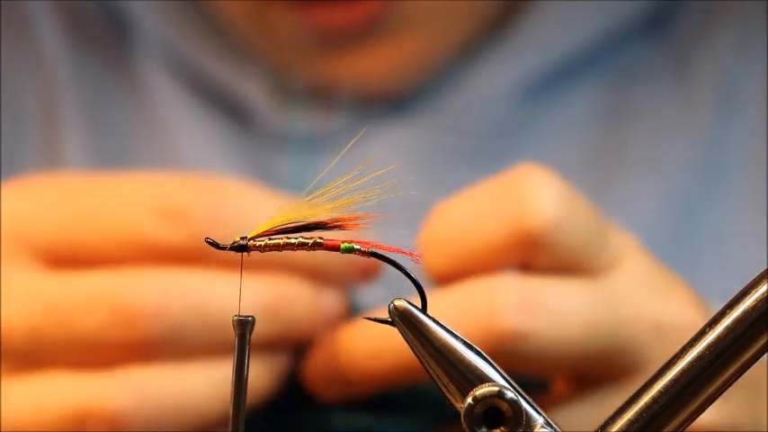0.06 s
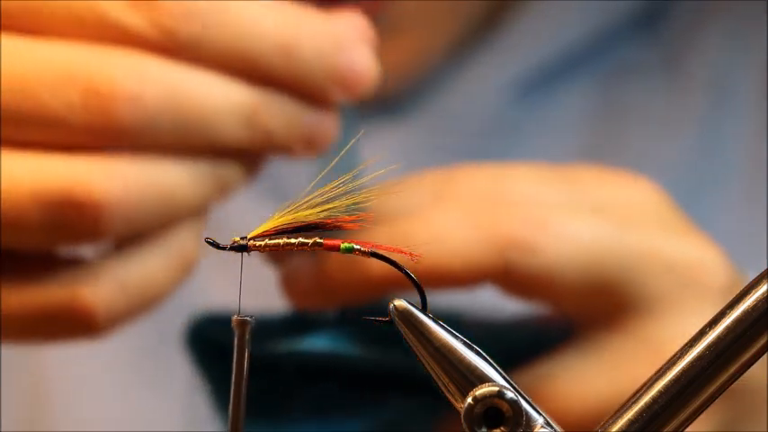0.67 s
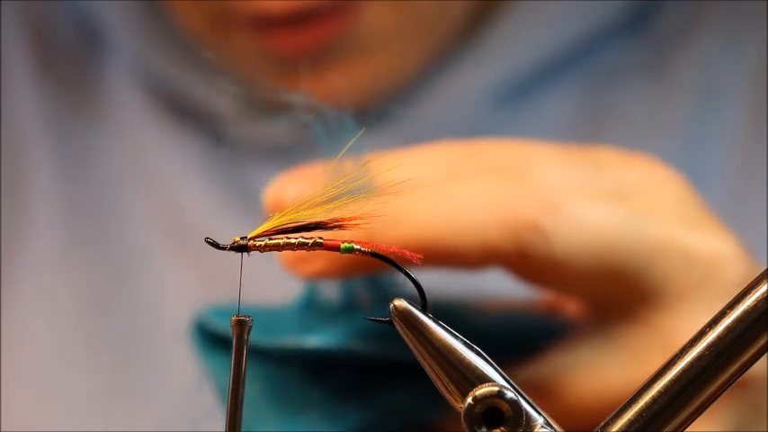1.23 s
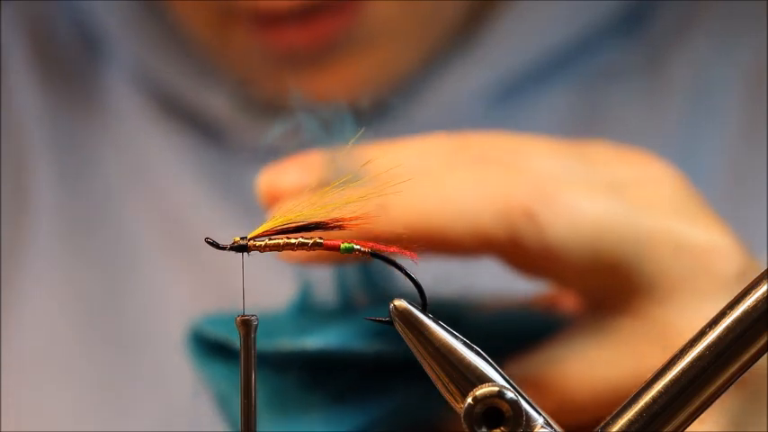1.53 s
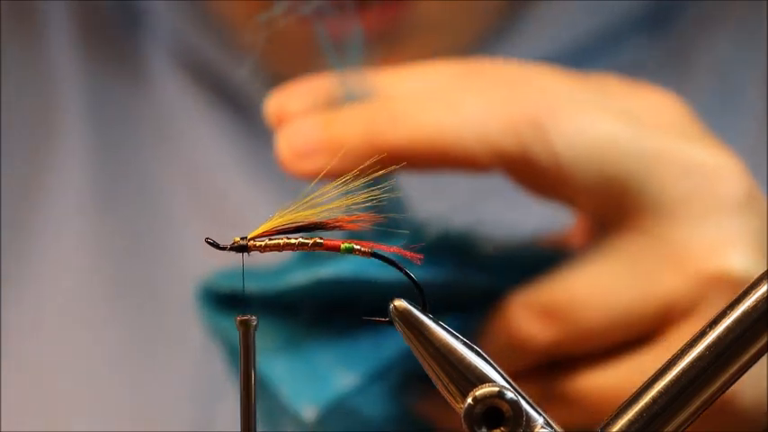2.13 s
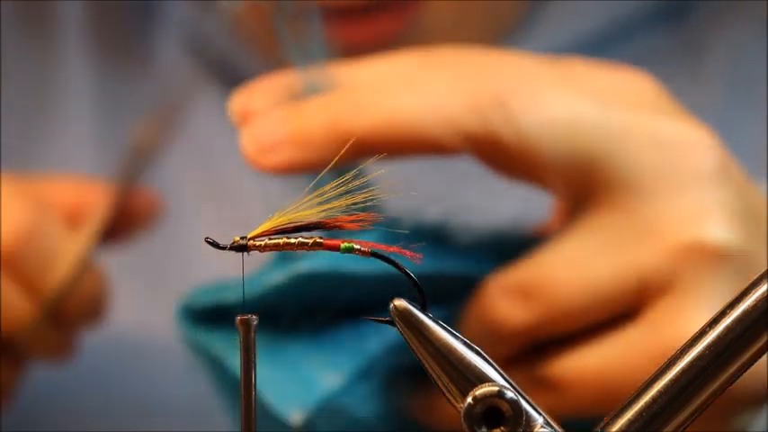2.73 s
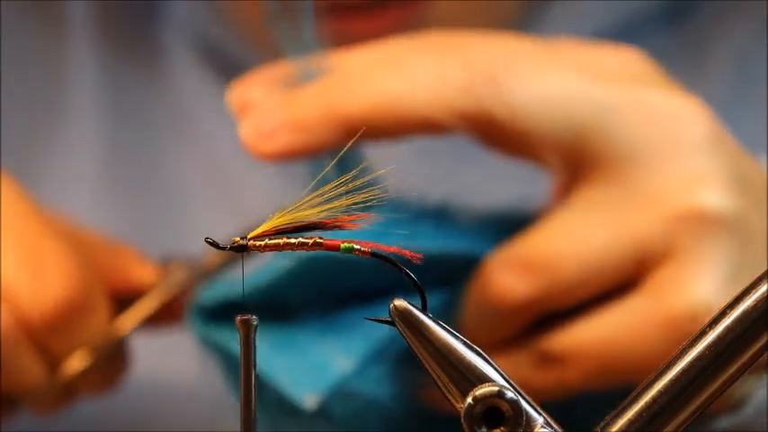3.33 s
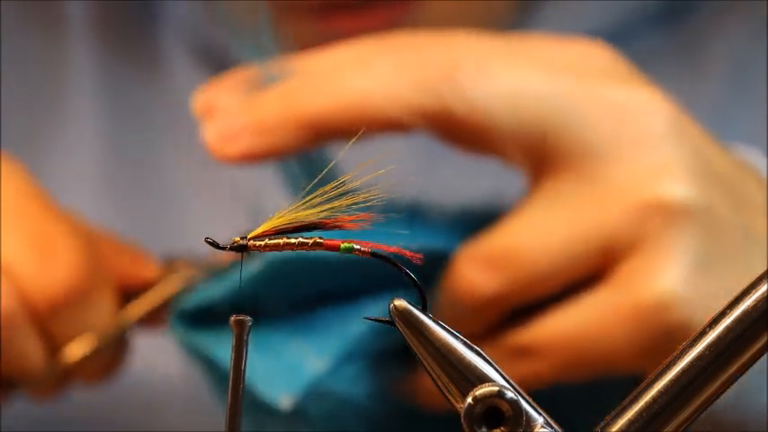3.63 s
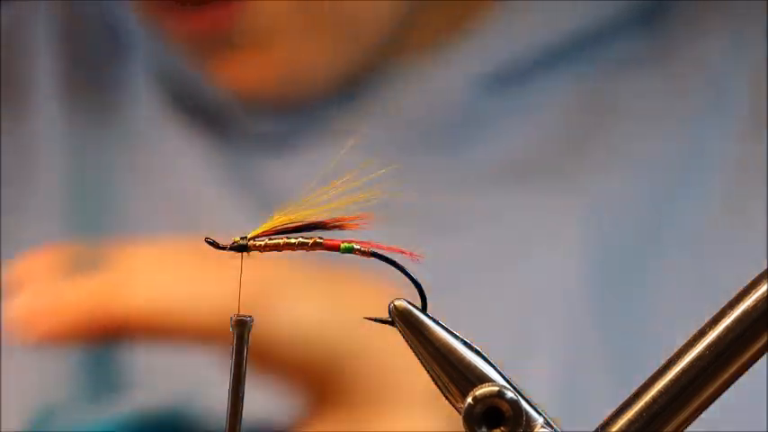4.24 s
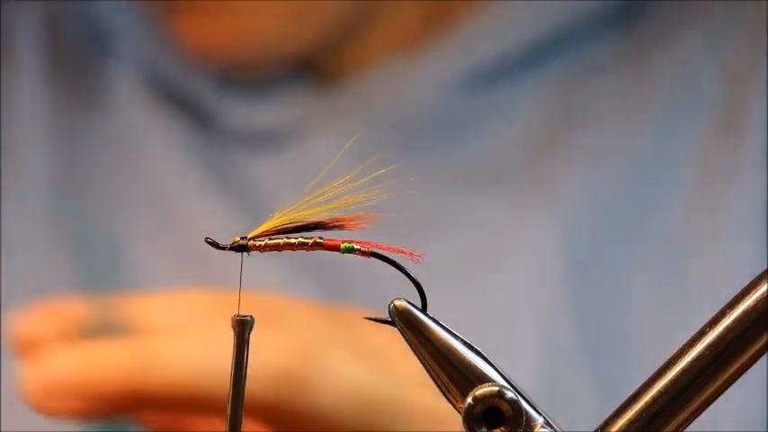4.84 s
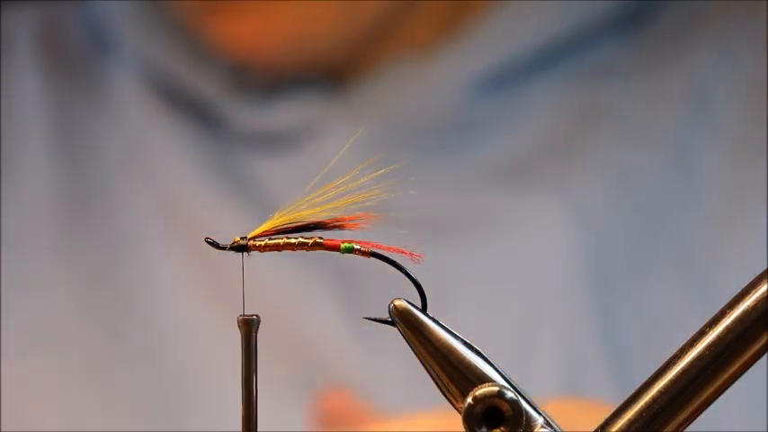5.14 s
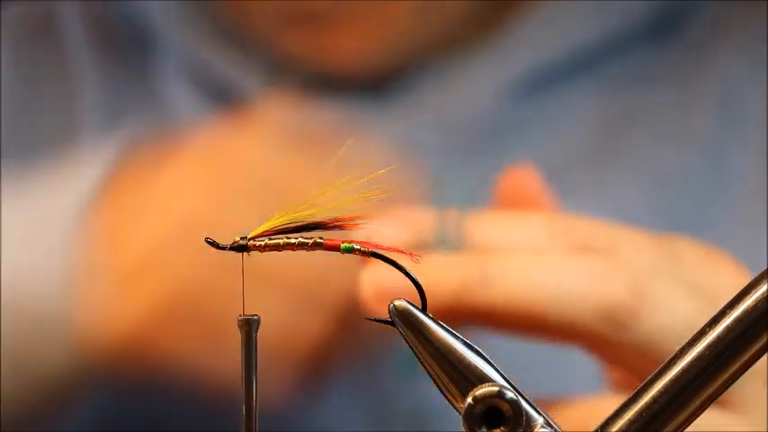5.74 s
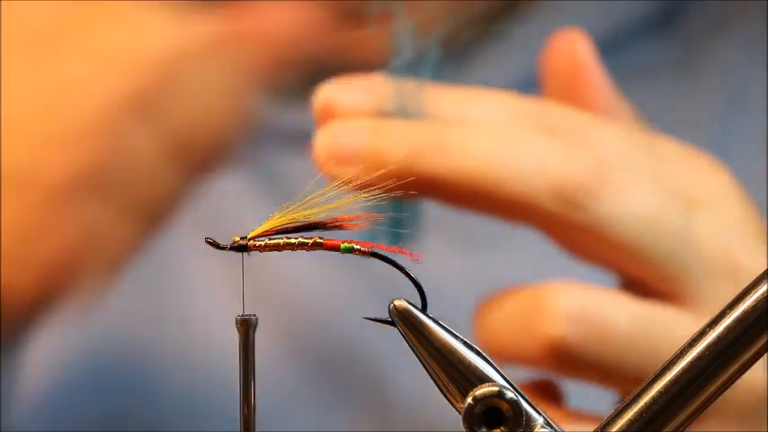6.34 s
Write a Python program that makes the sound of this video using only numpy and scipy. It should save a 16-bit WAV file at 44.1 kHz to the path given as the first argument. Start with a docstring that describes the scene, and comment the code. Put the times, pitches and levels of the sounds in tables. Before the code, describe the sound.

Small knocks and a metal scrape on wood, one soft snip, then scissors clattering down in a quiet, humming room.

```python
"""Close work at a fly-tying bench in a small room with a faint steady hum.
Near 1 s a hand brushes the bench, then knocks against the scissors and drags them off the top;
wood and steel ring. At 3.7 s the blades snip a pinch of synthetic fibre, filament by filament.
At 5 s the hand brushes the bench again. At 5.5 s the scissors are dropped back with a clatter
that overloads the microphone, and the loose blades chatter."""
import sys
import numpy as np
from scipy import signal
from scipy.fft import rfft, irfft, next_fast_len
from scipy.io import wavfile
from scipy.ndimage import uniform_filter1d

SR = 44100
rng = np.random.default_rng(int(sys.argv[2]) if len(sys.argv) > 2 else 0)


def persist_wave(psi):
    """Save psi, clipped to +-1, as 16-bit WAV."""
    counts = np.round(np.clip(psi, -1, 1) * 32767).astype(np.int16)
    wavfile.write(sys.argv[1], SR, np.atleast_2d(counts).T)


N = 290807
TIME_S = np.arange(N) / SR

# Modes of the bench top and of the scissors. Each row: frequency in Hz, level in dB, T60 in seconds.
BENCH_MODES = [(293, -23, .08), (394.5, -3, 0.088), (611, -1, 0.074), (720, 2.5, 0.086), (1017, -4.5, 0.12),
               (1199, 2, 0.082), (1295, 0, .1), (1370, -15.5, .14), (1530, -18, 0.13)]
STEEL_MODES = [(1800, 1, 0.052), (1810, -4, .028), (1920, -12, .09), (2290, -21, .08), (3420, -11, 0.039),
               (4830, -2.5, 0.03), (5560, -6.5, .025), (8400, -6.5, .025)]


def knocks(bench_db=-45, steel_db=-31, rebound_s=0.003, attack_s=0.005):
    """Each blow of hand or scissors cracks, rings the bench top and the steel, and rebounds once."""
    # Each row: start in seconds, attack rms in dB, hardness corner in Hz, then relative levels in dB
    # of thud, steel ring and rebound.
    blows = [ (1.2330, -35, 5200, 7, 1, -1.5), (1.297, -42, 2500, 0, -17, -20),
             (1.3165, -38, 1400, -8, -6, -13), (1.531, -26.5, 2200, 7.5, -5, -13),
             (1.5356, -26, 2600, 9, 10, 0), (1.5451, -17, 2290, -8.5, 4, 1.5),
             (1.6475, -40, 7000, 7, -22, -18), (1.7882, -33, 895, 6, -12, -7),
             (1.916, -28, 1700, 4, -3, -11), (1.9662, -24, 1280, -0.5, -9, -13),
             (2.2008, -40.5, 1400, 2, -1, -23), (2.235, -33.5, 3800, 2, 1, -15),
             (2.2859, -32, 1680, -6, -13, 0), (2.2967, -34, 1700, 0, -12, -1),
             (5.015, -43, 3500, 10.5, -12, -20), (5.0502, -43.5, 3990, 5, -7, -17.5),
             (5.338, -49, 1200, 0.5, -8.5, -20), (5.4808, -26, 10900, 17, 2.5, -15),
             (5.4984, -30, 7000, 17, 5, -15), (5.5114, -8.5, 4500, -8, -20.5, -14),
             (5.5434, -18.5, 2400, -7, -6, -14), (5.5502, -3, 9900, -5, -11.5, -4.5),
             (5.5918, -17.5, 2100, -9.5, -12.5, -15), (5.596, -21.5, 3600, -16, -6.5, -15),
             (5.622, -23.5, 5000, -15.5, -10, -7), (5.6289, -22, 5500, -2, 4, -20)]
    # Contact spectrum. Each row: frequency in Hz, level in dB.
    wood = [(40, -18), (130, -6), (190, 1), (290, -2), (480, -0.5), (660, 0), (820, -1.5), (1150, -0.5),
            (2000, 1.5), (3000, -2.5), (4800, 2.5), (5900, -3.5), (7200, -11.5), (10000, -20.5),
            (16000, -16)]
    out = np.zeros((2, N))
    for start_s, db, corner_hz, thud_db, ring_db, rebound_db in blows:
        for delay_s, contact_db in (0, db), (rebound_s, db + rebound_db):
            body = scatter(spray_db=6, t60_s=0.013) + gain_of(bench_db) * ring(BENCH_MODES)
            body += gain_of(steel_db + ring_db) * ring(STEEL_MODES)
            blow = convolve(body, pulse(wood, corner_hz, thud_db))
            attack_rms = blow[:, :round(attack_s * SR)].std(axis=1, keepdims=True)
            add(out, start_s + delay_s, gain_of(contact_db) * blow / attack_rms)
    return out


def blade_chatter():
    """After each landing the loose blades touch each other quickly and unevenly."""
    # Each row: peak time in seconds, level in dB, rise and fall in seconds.
    landings = [(5.553, -24.5, .002, .03), (5.626, -44, .012, .06)]
    # Touch spectrum. Each row: frequency in Hz, level in dB.
    blades = [(300, -20), (1000, -12.5), (1900, -3.5), (3200, 0), (4200, 1), (4800, 6), (6300, -4),
              (7500, -17.5), (16000, -28.5)]
    touches = convolve(slips(per_s=1200, spread_db=2), pulse(blades))
    return strokes(landings) * steadied(convolve(touches, scatter(spray_db=3, t60_s=0.02)))


def drags(bench_db=-44, steel_db=-45, boom_hz=1100, boom_width_hz=400, size=32768):
    """Steel stutters over the bench; each drag starts bright, then dulls and booms as it digs in."""
    # Each row: peak time in seconds, level in dB, rise and fall in seconds, hardness corner in Hz,
    # hollow boom of the top in dB.
    pushes = [(1.568, -31.5, .02, 0.022, 2800, 2), (1.69, -40.5, .062, 0.04, 2400, 6),
              (1.78, -44, 0.044, 0.089, 2000, -4), (1.922, -33, .075, 0.072, 2580, 5.5),
              (1.972, -31, .035, 0.037, 2590, 13), (2.0, -39.5, 0.025, 0.032, 4000, -6),
              (2.16, -50.5, 0.14, .07, 2100, -30), (2.295, -24, 0.081, .035, 2370, 14),
              (2.69, -52, 0.076, 0.074, 3000, -25), (2.79, -55, 0.067, .12, 2200, -22)]
    # Slip spectrum. Each row: frequency in Hz, level in dB.
    steel_on_wood = [(60, -20.5), (170, -14.5), (290, 5), (470, -5), (610, 1), (800, -9.5), (1100, -3),
                     (1400, -4), (1750, 3), (2600, -6), (3400, -3), (5400, -0.5), (7500, -3.5),
                     (16000, -10.5)]
    dulling_oct_per_s, boom_db_per_s, digging_s = 10, 49, 0.056
    out = np.zeros((2, N))
    t = (np.arange(size) - size // 2) / SR  # zero at the hardest push
    for peak_s, db, rise_s, fall_s, corner_hz, boom_db in pushes:
        body = scatter(spray_db=3.5, t60_s=0.032) + gain_of(bench_db) * ring(BENCH_MODES)
        body += gain_of(steel_db) * ring(STEEL_MODES)
        grit = convolve(slips(per_s=2800, spread_db=2, size=size), pulse(steel_on_wood))
        hz, frame_s, spectra = signal.stft(convolve(grit, body), SR, nperseg=256)
        dug_s = np.clip(frame_s + t[0], -digging_s, digging_s)
        dulling = rolloff(hz[:, None], corner_hz * 2 ** (-dulling_oct_per_s * dug_s))
        boom = gain_of(boom_db + boom_db_per_s * dug_s) * rolloff(hz[:, None] - boom_hz, boom_width_hz / 2)
        scrape = signal.istft(spectra * dulling * (1 + boom), SR, nperseg=256)[1][:, :size]
        add(out, peak_s + t[0], swell(t, db, rise_s, fall_s) * steadied(scrape))
    return out


def snip(peak_s=3.747):
    """Hundreds of filaments part one after another between the blades."""
    # Spectrum of one parting. Each row: frequency in Hz, level in dB.
    fibre = [(200, -7), (600, -4), (1300, -26), (1700, 3.5), (2100, 7), (2900, -1), (3800, 0), (4800, -5),
             (7000, 3.5), (9500, -5), (12500, -10), (16000, -17)]
    partings = convolve(slips(per_s=8200, spread_db=-0.5), pulse(fibre))
    closing = swell(TIME_S - peak_s, db=-37.5, rise_s=0.0338, fall_s=0.007)
    return closing * steadied(convolve(partings, scatter(spray_db=0, t60_s=0.021)))


def snaps():
    """Bright ticks of fibre and blade, too light to ring the bench."""
    # Each row: start in seconds, direct peak in dB.
    ticks = [(0.919, -40), (1.207, -22), (1.232, -26), (1.2631, -26), (3.7425, -30.5), (3.758, -36),
             (3.8120, -35.5), (5.0508, -36), (6.374, -44.5)]
    # Each row: frequency in Hz, level in dB.
    tick_spectrum = [(200, -3.5), (1200, 10), (3500, 7), (5200, 4), (8000, 2.5), (12000, -4.5),
                     (16000, -10)]
    out = np.zeros((2, N))
    for start_s, db in ticks:
        tick = convolve(scatter(spray_db=2, t60_s=0.0063), pulse(tick_spectrum))
        add(out, start_s, gain_of(db) * tick)
    return out


def brushes():
    """Skin and sleeve slip over the bench in a fine, broad rustle."""
    # Each row: peak time in seconds, level in dB, rise and fall in seconds.
    sweeps = [(1.178, -46, 0.02, 0.16), (1.252, -43, .035, 0.072), (5.013, -53.5, 0.057, 0.062),
              (5.068, -55.5, 0.039, .08)]
    # Slip spectrum. Each row: frequency in Hz, level in dB.
    skin = [(80, -12.5), (300, 0), (1200, 1.5), (2500, -2.5), (3700, -3), (5000, -6.5), (8500, -6.5),
            (12000, -18.5), (16000, -19.5)]
    grit = convolve(slips(per_s=6700, spread_db=4), pulse(skin))
    return strokes(sweeps) * unit_rms(convolve(grit, scatter(spray_db=1.5, t60_s=0.031)))


def room(x, size=32768, count=3, build_s=0.0023):
    """Diffuse tails, each band dying at its own rate, crossfade steadily so no resonance stands out."""
    # Each row: frequency in Hz, left-right coherence.
    coherence = [(150, 1.1), (400, 0.95), (1200, 0.24)]
    # Each row: frequency in Hz, T60 in seconds.
    decay = [(120, 0.8), (500, .34), (1500, 0.4), (3000, 0.4), (5500, 0.4149), (8000, 0.26), (15000, 0.21)]
    # Each row: frequency in Hz, level in dB.
    colour = [(100, -7.5), (400, 1), (800, -2), (1200, 1), (2000, 1), (3500, -1), (5000, -6.5), (8000, 2),
              (15000, -1)]
    hz, t, spectra = signal.stft(rng.standard_normal((count, 2, size)), SR, nperseg=256)
    shared = np.clip(lookup(coherence, hz), -1, 1)[:, None]
    spectra[:, 1] = shared * spectra[:, 0] + np.sqrt(1 - shared ** 2) * spectra[:, 1]
    spectra *= gain_of(lookup(colour, hz)[:, None] - 60 * t / lookup(decay, hz)[:, None])
    tails = signal.istft(spectra, SR, nperseg=256)[1][..., :size]
    tails *= np.clip(np.arange(size) / SR / build_s, 0, 1) ** 2
    tails /= np.linalg.norm(tails, axis=2, keepdims=True)
    # Constant-power crossfade, 1 s cycle.
    fades = np.sqrt(2 / count) * np.cos(np.pi * (2 * TIME_S + np.arange(count)[:, None] / count))
    return sum(convolve(x * fade, tail) for fade, tail in zip(fades, tails))


def air(rms_db=-53.5):
    """Steady rumble and hiss, alike on both sides only in the bass."""
    # Each row: frequency in Hz, relative density in dB.
    colour = [(20, -12.5), (40, -7.5), (58, -7.5), (85, -6.5), (120, -3), (170, -5.5), (300, -8),
              (480, -11.5), (720, -14), (1470, -17), (2200, -19), (5000, -23), (7900, -25), (15800, -33)]
    # Each row: frequency in Hz, left-right coherence.
    coherence = [(60, 0.7), (150, 0.8), (380, 0.52), (950, 0.16), (2380, 0.0712), (5980, 0.063),
                 (15000, 0.07)]
    size = next_fast_len(N, True)
    hz = np.fft.rfftfreq(size, 1 / SR)
    left, independent = rfft(rng.standard_normal((2, size)))
    shared = lookup(coherence, hz)
    right = shared * left + np.sqrt(1 - shared ** 2) * independent
    spectra = np.array([left, right]) * gain_of(lookup(colour, hz))
    return gain_of(rms_db) * unit_rms(irfft(spectra, size)[:, :N])


def hum(waver_hz=5, size=1024):
    """Hum and faint motor whine: steady lines that waver in level and phase."""
    # Each row: frequency in Hz, left and right rms in dB, waver as a fraction.
    lines = [(119.7, -54, -56.5, 0.25), (60.3, -65, -69, .8), (877, -78.5, -77, 0.506),
             (1380, -75, -76.5, 0.43), (1470, -87, -68, 0.57)]
    t = np.linspace(0, N / SR, size)
    hz = np.fft.fftfreq(size, t[1])
    out = np.zeros((2, N))
    for line_hz, left_db, right_db, depth in lines:
        noise = rng.standard_normal(size) + 1j * rng.standard_normal(size)
        waver = unit_rms(np.fft.ifft(noise / (1 + (hz / waver_hz) ** 2)))
        tone = (1 + depth * np.interp(TIME_S, t, waver)) * np.exp(2j * np.pi * line_hz * TIME_S)
        out += gain_of([[left_db], [right_db]]) * unit_rms(tone.real)
    return out


def pulse(colour, corner_hz=None, thud_db=0, thud_hz=550, size=2048):
    """Minimum-phase click of peak 1; thud_db raises or lowers the bass, corner_hz dulls the treble."""
    hz = abs(np.fft.fftfreq(size, 1 / SR))
    gain = gain_of(lookup(colour, hz) + thud_db * rolloff(hz, thud_hz))
    if corner_hz:
        gain *= rolloff(hz, corner_hz)
    spectrum = np.exp(np.conj(signal.hilbert(np.log(gain))))
    click = np.fft.ifft(spectrum).real[:size // 2]
    return click / abs(click).max()


def ring(modes, size=6000):
    """Decaying sines, at a different phase in each channel."""
    t = np.arange(size) / SR
    out = np.zeros((2, size))
    for hz, db, t60_s in modes:
        phase_cycles = rng.uniform(-0.044, 0.15, (2, 1))
        out += gain_of(db - 60 * t / t60_s) * np.sin(2 * np.pi * (hz * t + phase_cycles))
    return out


def scatter(spray_db, t60_s, size=6000, highpass_hz=700, gap_s=0.0004):
    """Direct sound plus a spray of reflections off small things, which the bass passes by."""
    t = np.arange(size) / SR
    spray = rng.standard_normal((2, size)) * gain_of(-60 * t / t60_s) * (t > gap_s)
    spray = signal.sosfilt(signal.butter(1, highpass_hz, "high", fs=SR, output="sos"), spray)
    spray *= gain_of(spray_db) / np.linalg.norm(spray, axis=1, keepdims=True)
    spray[:, 0] += 1
    return spray


def slips(per_s, spread_db, size=N):
    """Friction: a dense train of tiny slips of uneven size."""
    height = gain_of(spread_db * np.minimum(rng.exponential(1, size), 4))
    return unit_rms(height * rng.choice([-1, 1], size) * (rng.random(size) < per_s / SR))


def swell(t, db, rise_s, fall_s, rounding=1.71):
    """Stroke gain: up 20 dB over rise_s to the peak at t = 0, then down 20 dB every fall_s."""
    return gain_of(db - 20 * (np.maximum(-t, 0) / rise_s) ** rounding - 20 * np.maximum(t, 0) / fall_s)


def strokes(rows):
    """Summed gain of several timed strokes."""
    return sum(swell(TIME_S - peak_s, *shape) for peak_s, *shape in rows)


def steadied(x, span_s=0.022):
    """Running rms of 1, so the stroke alone sets the level."""
    power = uniform_filter1d((x ** 2).mean(0), round(span_s * SR))
    return x / np.sqrt(abs(power) + 1e-20)


def rolloff(hz, corner_hz):
    """Low-pass gain, 12 dB per octave."""
    return 1 / np.sqrt(1 + (hz / corner_hz) ** 4)


def gain_of(db):
    """Decibels to amplitude."""
    return 10 ** (np.asarray(db) / 20)


def unit_rms(x):
    """Overall rms of 1."""
    return x / np.sqrt(np.mean(abs(x) ** 2) + 1e-20)


def lookup(points, hz):
    """Interpolates a table over log frequency."""
    point_hz, values = np.transpose(points)
    return np.interp(np.log(hz + 1), np.log(point_hz + 1), values)


def add(mix, start_s, sound):
    """Mixes in a stereo sound."""
    part = mix[:, round(start_s * SR):][:, :sound.shape[1]]
    part += sound[:, :part.shape[1]]


def convolve(x, response):
    """Filters along time, keeping the length."""
    return signal.oaconvolve(np.atleast_2d(x), np.atleast_2d(response), axes=1)[:, :np.shape(x)[-1]]


def scene(blow_send_db=-10, rub_send_db=-11, cut_send_db=-10):
    """Bench sounds and their room tail over air and hum."""
    blows = knocks() + blade_chatter()
    rubs = drags() + brushes()
    cuts = snip() + snaps()
    send = gain_of(blow_send_db) * blows + gain_of(rub_send_db) * rubs + gain_of(cut_send_db) * cuts
    return blows + rubs + cuts + room(send) + air() + hum()


def record(dry):
    """The loudest blows overload the microphone; a low-pass follows."""
    ceiling, cutoff_hz = 0.92, 16000
    lowpass = signal.firwin(511, cutoff_hz, window=("kaiser", 9), fs=SR)
    return signal.oaconvolve(np.clip(dry, -ceiling, ceiling), lowpass[None], "same")


dry = scene()
out = record(dry)
persist_wave(out)
```